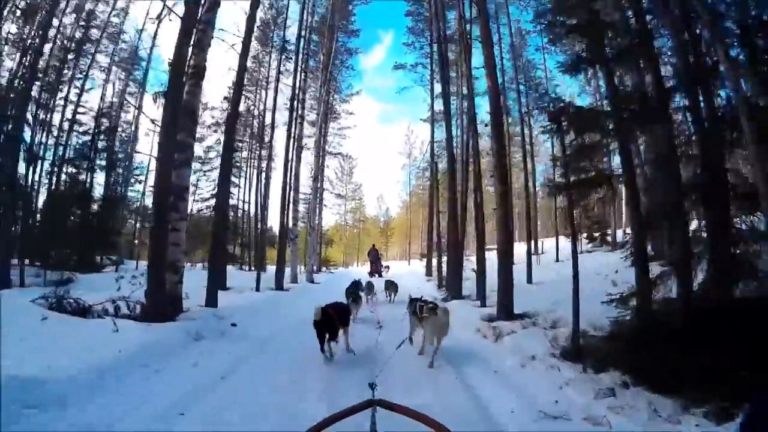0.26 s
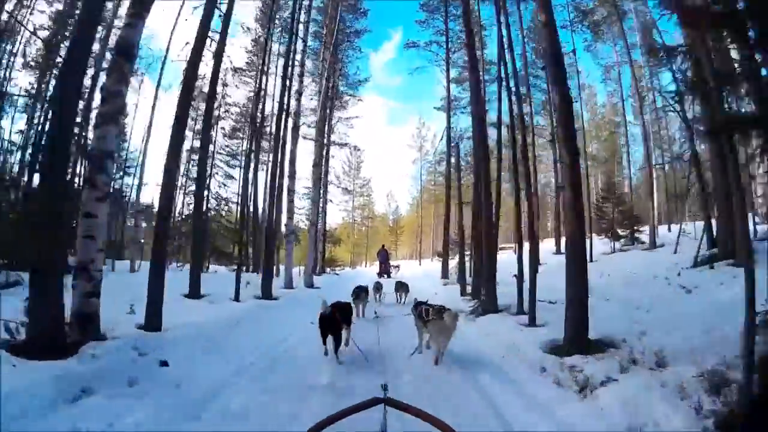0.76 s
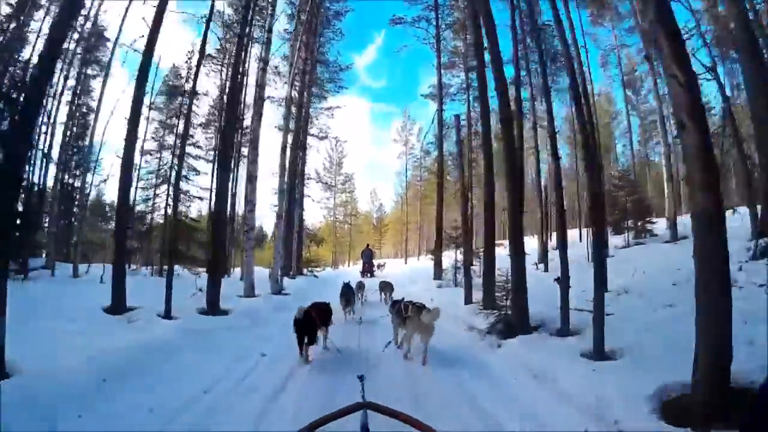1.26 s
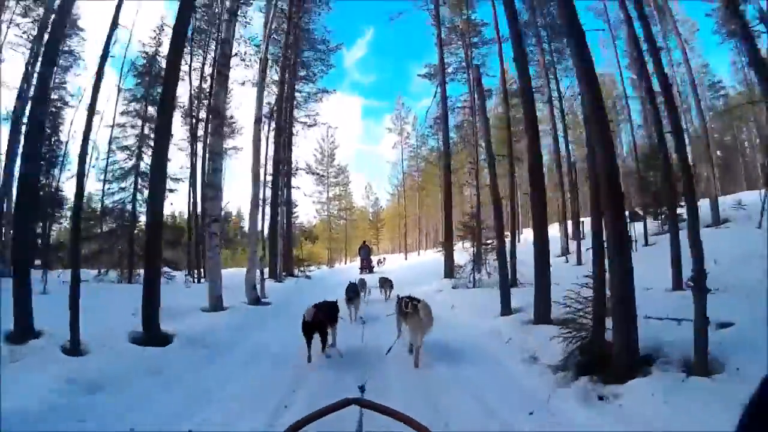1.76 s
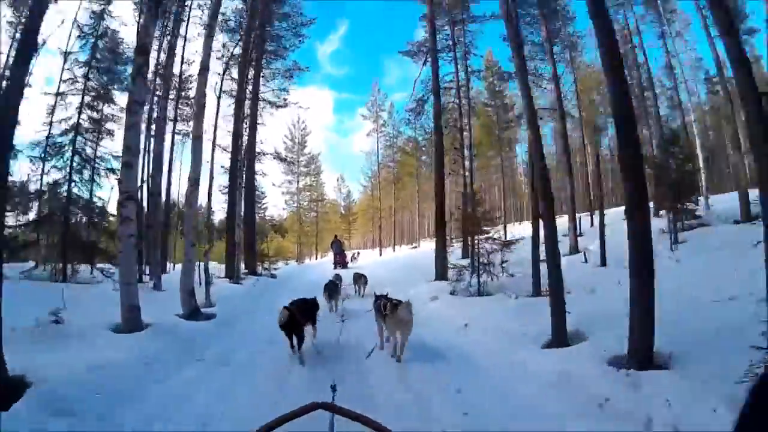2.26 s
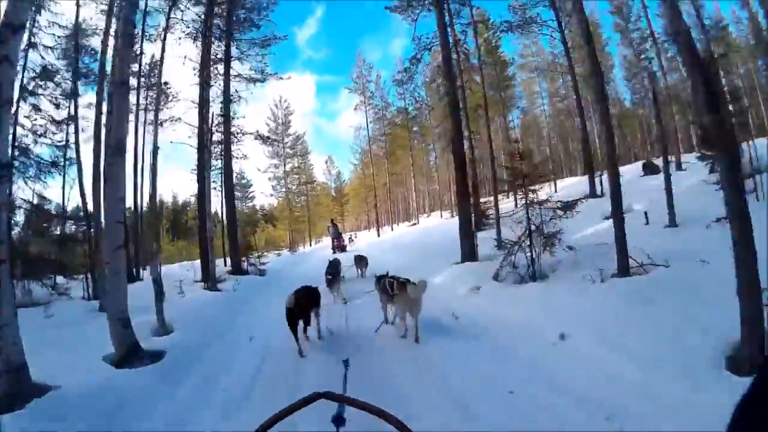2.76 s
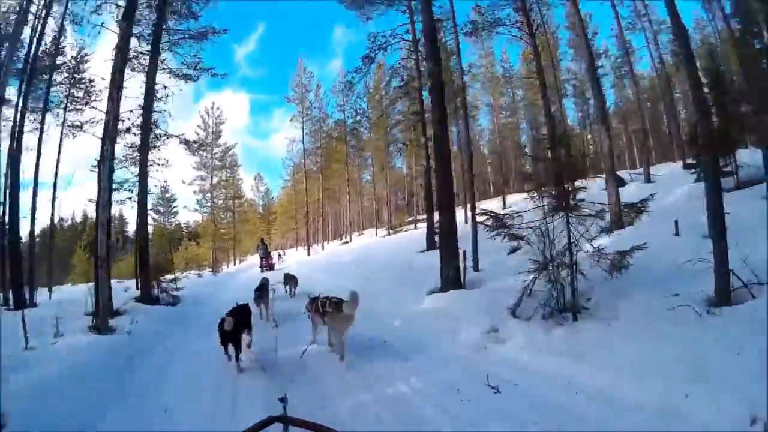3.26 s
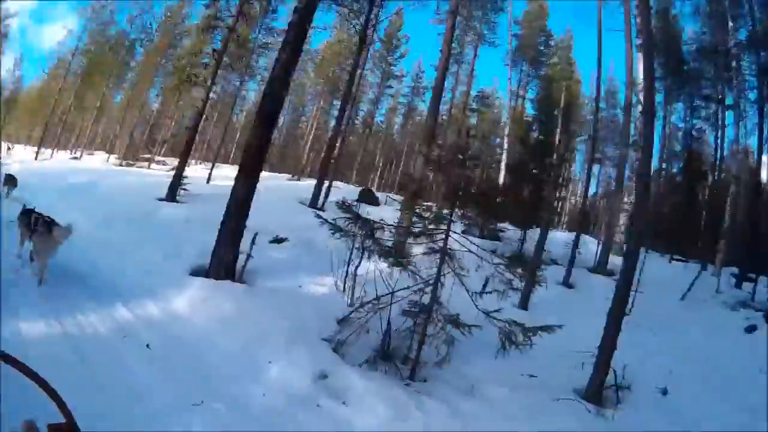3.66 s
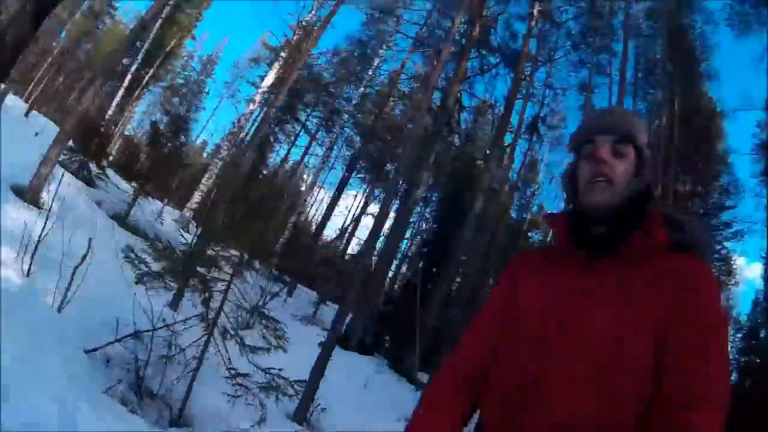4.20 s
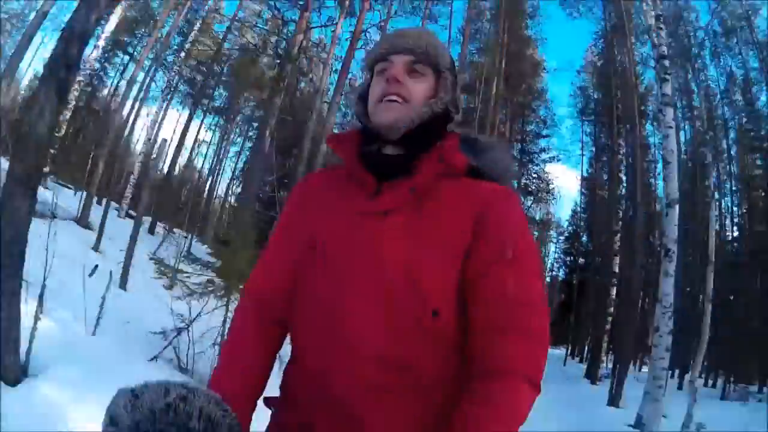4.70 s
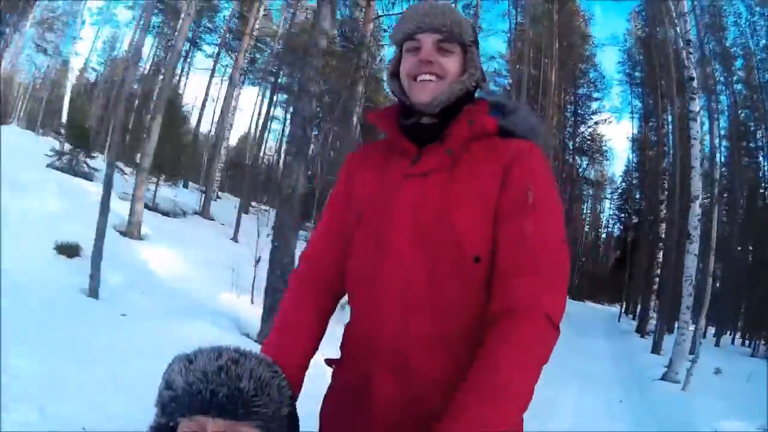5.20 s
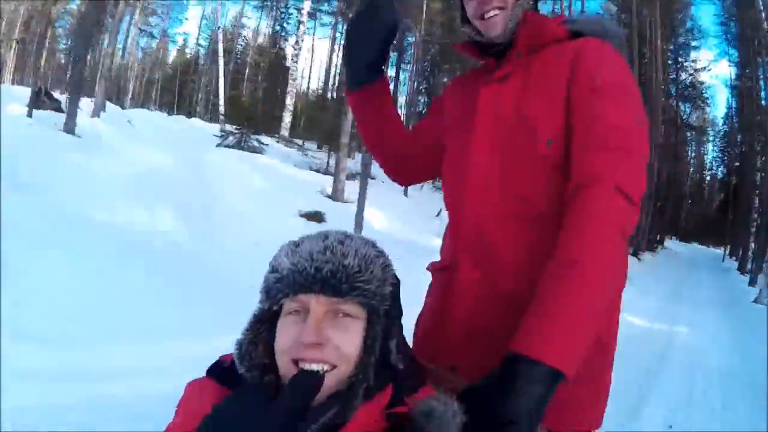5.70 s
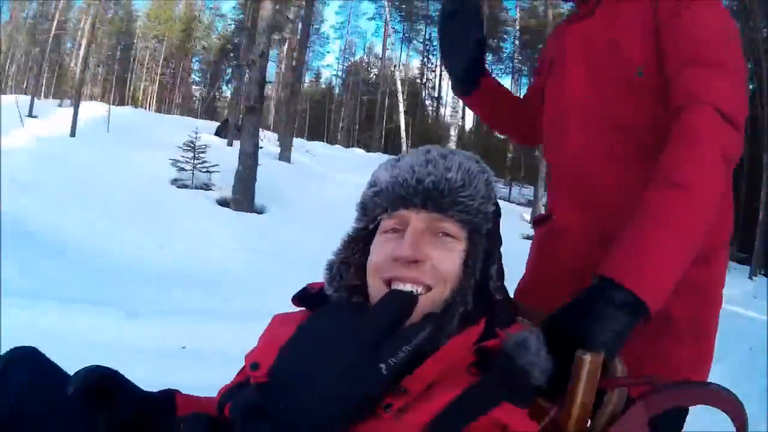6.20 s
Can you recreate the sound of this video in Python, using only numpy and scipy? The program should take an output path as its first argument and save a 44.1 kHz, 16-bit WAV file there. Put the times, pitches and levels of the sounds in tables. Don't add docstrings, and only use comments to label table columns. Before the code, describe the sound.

A microphone riding on a dog sled picks up gritty grinding snow, crisp crust snaps and powdery swishes. Bumps make short, dry knocks in the wooden frame, some in quick rattles. Wind buffets the case with low thuds and short moans, easing around one second, gusting near two, then roaring heavily in the last two seconds over faint electronic hiss.

```python
import sys
import numpy as np
from scipy import signal
from scipy.fft import rfft, irfft
from scipy.io import wavfile
from scipy.ndimage import uniform_filter1d

SR = 44100
rng = np.random.default_rng(int(sys.argv[2]) if len(sys.argv) > 2 else 0)


def dump(signal):
    limited = np.clip(np.atleast_2d(signal).T, -1, 1)
    pcm = np.round(limited * 32767).astype(np.int16)
    wavfile.write(sys.argv[1], SR, pcm)


def gain_from_decibels(decibels):
    exponent = np.asarray(decibels, float) / 20
    return 10 ** exponent


N = 284445

# f/Hz, density/dB per Hz
HISS_SPECTRUM = [(3000, -13), (8000, 1), (12000, -2), (13500, -2), (15200, -5), (15800, -12)]
# f/Hz, level/dB
WHINE = [(7267, -83), (9489, -83.5), (9525, -81), (9562, -83)]

# t/s, strength level/dB, share of large eddies/dB
WIND = [(0, -34.5, 4), (0.25, -40, 11.5), (0.6, -40, 2), (0.95, -46, 8.5), (1.25, -30.5, 9),
        (1.5, -37.5, 8), (1.9, -24, -1), (2.35, -31, 5.5), (2.6, -25, -1), (2.99, -32, 12.5),
        (3.05, -39, 4.5), (3.45, -33.5, -10), (4.15, -31, -4), (4.22, -22, -5), (4.65, -23.5, -6),
        (5.1, -19, -3), (5.85, -21.5, -1), (6.45, -30, 0)]
# centre t/s, length/s, strength level/dB, large eddies/dB
GUSTS = [(0.205, 0.099, 0.5, -3.5), (0.815, 0.11, 2, -8), (0.945, 0.1, -4.5, -2), (1.065, 0.55, 6, -9),
         (1.345, 0.084, -3, -1.5), (1.445, 0.16, -12.5, 3.5), (1.725, 0.17, 4, -4.5),
         (1.955, 0.081, 0.5, -3.5), (2.075, 0.22, -2, -4.5), (2.395, 0.28, -1.5, -3),
         (2.765, 0.085, -4.5, 1), (2.925, 0.17, 1, -7), (3.335, 0.36, -8.5, 12), (3.545, 0.15, 2, 3),
         (4.005, 0.1, 4.5, 2.5), (4.505, 0.18, -6, 7), (4.635, 0.079, -6, 8), (5.265, 0.085, -4.5, -4),
         (5.365, 0.11, 3.5, 0.5), (5.565, 0.23, -3.5, 5.5), (5.825, 0.068, -0.5, 2), (6.015, 0.43, -4, 0.5),
         (6.235, 0.087, -2.5, 2), (6.355, 0.11, 6.5, 4.5)]
# centre t/s, length/s, level/dB
PUFFS = [(0.095, 0.027, -14), (0.2, 0.08, 6), (0.341, 0.03, -2.5), (0.433, 0.026, 6.5), (0.688, 0.04, -6),
         (0.962, 0.04, 1), (1.083, 0.027, 3.5), (1.214, 0.02, -17), (1.261, 0.04, -6), (1.341, 0.036, -2),
         (1.444, 0.06, -2), (1.56, 0.03, 2), (1.819, 0.035, -6), (2.299, 0.04, 1), (2.379, 0.066, -2.5),
         (2.443, 0.05, -1), (2.502, 0.045, 2), (2.76, 0.03, 3.5), (2.814, 0.09, 1), (2.891, 0.019, -9),
         (3.038, 0.037, 0), (3.191, 0.035, -10), (3.238, 0.03, 0), (3.343, 0.03, -7), (3.516, 0.03, -7),
         (3.661, 0.013, 5), (3.769, 0.053, -3), (3.879, 0.03, 6.5), (4.105, 0.043, 0.5), (4.232, 0.091, 2),
         (4.429, 0.038, -2), (4.519, 0.04, 0), (4.622, 0.068, -4), (4.758, 0.1, -2), (4.856, 0.03, -1.5),
         (5.123, 0.069, -4.5), (5.179, 0.034, -4), (5.346, 0.03, -4.5), (5.455, 0.042, -6),
         (5.524, 0.072, -4), (5.59, 0.053, -7.5), (5.828, 0.037, 2), (6.347, 0.061, -4.5),
         (6.409, 0.036, 0.5)]
# f/Hz, density/dB per Hz
RUMBLE_SPECTRUM = [(15, -9), (30, -0.5), (45, -1.5), (65, 0.5), (95, -3.5), (150, -23), (300, -58)]
# f/Hz, density/dB per Hz
BUFFET_SPECTRUM = [(40, -24), (90, -1.5), (150, 1), (260, -2.5), (360, -6), (600, -16.5), (1200, -40)]
# f/Hz, density/dB per Hz
ROAR_SPECTRUM = [(170, -11.5), (330, 0.5), (450, 0), (700, -2.5), (950, -7.5), (1300, -14.5), (2500, -30)]
# centre t/s, length/s, f/Hz, level/dB
MOANS = [(.215, .14, 110, -30), (0.656, 0.075, 420, -42), (1.256, 0.062, 201, -30), (1.305, .04, 169, -27),
         (1.638, 0.078, 260, -36), (1.935, 0.1, 354, -28), (1.976, 0.078, 272, -25.5),
         (2.051, 0.077, 720, -32), (2.3, 0.043, 260, -27), (3.166, 0.046, 234, -36.5),
         (3.534, .04, 248, -31.5), (3.664, 0.031, 570, -32.5), (3.904, 0.044, 193, -38),
         (4.45, 0.073, 194, -33), (4.977, 0.049, 444, -34), (4.969, 0.15, 970, -30.5),
         (5.119, 0.039, 322, -17), (5.342, .04, 400, -21), (5.487, 0.034, 366, -19.5),
         (5.547, 0.029, 292, -26.5), (5.739, 0.03, 423, -25.5)]

# start t/s, end t/s, level/dB, brightest f/Hz
SKIDS = [
    (1.88, 1.999, -47, 12900),
    (2.89, 3.012, -48, 16500),
    (2.125, 2.192, -54, 11500),
    (5.27, 5.302, -56, 16500),
]
# f/Hz, density/dB per Hz
POWDER_SPECTRUM = [(2500, 1), (3700, 7), (5300, -1), (6400, -12), (7200, -3), (8600, -5.5), (10800, -8),
                   (13000, -13), (15800, -21)]

# t/s, peak level/dB, strongest ring f/Hz, upper rings level/dB
KNOCKS = [(0.028, -20, 940, -24), (0.207, -39, 1050, 4), (0.354, -8, 1080, -23), (0.397, -15.5, 1020, -11),
          (0.554, -14.5, 1160, -16), (0.724, -32, 1020, -3), (1.012, -24, 1020, -23),
          (1.145, -25, 1020, -16), (1.17, -20.5, 930, -6.5), (1.381, -15, 1530, -23),
          (1.887, -19, 900, -20), (2.12, -13, 1620, -22), (2.165, -10, 1080, -24), (2.218, -5, 885, -15),
          (2.265, -16, 1710, -21), (2.397, -12.5, 890, -28), (2.436, -15, 1050, -18),
          (2.559, -4.5, 1390, -38), (2.576, -6.5, 1370, -26), (2.64, -9.5, 1440, -30),
          (3.071, -10, 1080, -22), (3.223, -10, 1060, -17), (3.658, -17, 750, -18), (4.184, -12, 900, -29),
          (5.054, -4.5, 870, -21), (5.196, -8.5, 1020, -20), (5.477, -10, 810, -30), (5.633, -2, 1110, -43),
          (5.675, -11, 1090, -18), (6.354, -26, 950, -9), (0.447, -21, 1300, -24), (0.99, -27, 1000, -20),
          (1.731, -12, 980, -25), (1.773, -14, 1030, -32), (1.977, -12.5, 1650, -36),
          (2.182, -10.5, 1720, -22), (2.281, -21, 1010, -11), (2.489, -17, 902, -28),
          (2.703, -14.5, 1320, -17), (3.055, -15.5, 1150, -16), (3.079, -13.5, 1380, -25),
          (3.241, -9, 1000, -28), (3.597, -14, 1400, -17), (3.937, -21, 902, -15), (4.801, -8.5, 1120, -24),
          (4.9, -10, 1130, -21), (5.288, -20, 1170, -15), (5.369, -12, 910, -30), (5.612, -16, 1090, -26),
          (5.847, -19, 1200, -28),
          (.363, -29, 1100, -12), (.379, -32, 1300, -4), (.563, -20, 1300, -24), (2.229, -8, 1090, -24),
        (2.494, -14, 1300, -22), (2.534, -15, 1600, -25), (2.587, -14, 1490, -25), (2.602, -19, 1500, -28),
        (2.611, -19, 1600, -18), (2.649, -9, 1450, -25), (2.688, -15, 960, -26), (2.713, -11.5, 1490, -23)]
# f/Hz, level/dB, decay t60/s
FRAME_MODES = [(1020, 5, 0.0059), (1420, -10.5, 0.025), (1715, -9, 0.019)]
# f/Hz, level/dB, decay t60/s
STRUT_MODES = [(2260, 7.5, 0.024), (2564, 6, 0.021), (2950, 2, 0.013), (3425, 6.5, 0.017),
               (3740, -24, .015), (4850, -10.5, 0.023)]

# t/s, load level/dB, loose powder level/dB
RUNNERS = [(0, -38.5, -26.5), (0.55, -36.5, -25.5), (0.9, -42, -37), (1.05, -39.5, -22), (1.7, -33, -25),
           (2.05, -40.5, -15.5), (2.35, -35.5, -26.5), (2.6, -33.5, -24.5), (2.85, -35.5, -24.5),
           (3.1, -31.5, -25), (3.45, -33.5, -24), (3.95, -36.5, -16.5), (4.79, -37, -20),
           (4.84, -26.5, -36.5), (5.3, -29, -27.5), (5.95, -36, -25), (6.08, -32.5, -21.5),
           (6.45, -33, -21.5)]
# centre t/s, length/s, level/dB, powder thrown/dB
RUTS = [(.285, 0.097, -0.5, 0), (.385, .13, 0, 1.5), (.565, .06, 1.5, 2), (.695, 0.18, 4.5, 5),
        (.9, 0.082, 6.5, 4), (.965, 0.21, -7.5, 3), (1.115, .083, -1, -4), (1.185, 0.098, 1, -2),
        (1.325, 0.16, -2, -2), (1.625, 0.07, -1.5, -2), (2.055, .06, -5, 0), (2.145, 0.11, 5.5, 0.5),
        (2.215, 0.21, -1.5, 0.5), (2.29, 0.098, 3, 0), (2.495, 0.039, 4.5, 2), (2.7, 0.15, 1, 3.5),
        (3.075, .1, -1, 4), (3.195, 0.053, -0.5, 0), (3.325, 0.28, -4, 3), (3.495, 0.099, -3, 0),
        (3.725, 0.05, -2, -3), (3.835, 0.15, -2.5, -1.5), (3.945, 0.083, 4, -4.5), (4.335, 0.16, 7.5, -6),
        (4.455, 0.19, 4.5, -3), (5.06, 0.091, 0, -1), (5.345, 0.26, 0.5, 0.5), (5.685, 0.14, 3, 0),
        (5.845, 0.051, 4, -1), (6.265, .13, -0.5, -3.5)]
# centre t/s, length/s, level/dB
LUMPS = [(0.017, 0.03, 7), (0.131, 0.034, 6), (0.191, 0.19, -2.5), (0.307, 0.04, 1), (0.43, 0.027, -9),
         (0.485, 0.028, -4), (0.702, 0.065, -6), (0.749, 0.065, -3.0), (0.813, 0.05, -5), (0.916, 0.03, -4),
         (1.033, 0.073, 9), (1.35, 0.09, -3), (1.607, 0.045, -1.5), (1.692, 0.063, 2.5), (1.825, 0.053, -1),
         (1.915, 0.05, -13), (1.979, 0.051, -16), (2.078, 0.079, -4), (2.19, 0.056, 5.5), (2.38, 0.16, -5),
         (2.517, 0.03, -3), (2.687, 0.04, -1), (2.785, 0.065, -3), (2.86, 0.044, 1.5), (3.081, 0.045, 5),
         (3.179, 0.04, -6.5), (3.326, 0.044, -1), (3.472, 0.09, -4.0), (3.604, 0.034, 0),
         (3.656, 0.036, -2), (4.884, 0.073, -4), (5.267, 0.063, -5), (5.318, 0.044, 5.5), (5.37, 0.04, 4),
         (5.439, 0.1, -3.5), (5.536, 0.046, 1.5), (6.117, 0.036, 4), (6.37, 0.07, -1)]
# centre t/s, length/s, level/dB
FLURRIES = [(.361, 0.065, 5), (.472, .04, -7), (1.176, .04, 6), (1.598, .04, -3), (1.81, .09, -3),
            (2.042, .09, -4), (2.119, .03, -4), (2.221, 0.015, 13), (2.31, .06, -4), (2.574, 0.046, 6),
            (2.873, .04, 3), (2.959, .05, 6), (3.023, .04, -5), (3.25, .04, -7), (3.419, .05, 5),
            (3.613, .04, -1), (3.68, .04, 2), (3.71, .05, -4), (3.938, 0.04, 7), (4.078, 0.026, 5),
            (4.435, .03, 0), (4.485, .03, 4.5), (4.53, 0.049, 5), (4.749, 0.1, 4), (5.347, .025, 5),
            (5.951, 0.077, -4), (6.079, .05, 3), (6.2, .04, 4)]
# t/s, level over the steady crunch/dB
SNAPS = [(.026, 5), (.158, 9), (.209, 9), (.227, 10), (.355, 8), (.397, 8), (.448, 8), (.552, 8), (.724, 9),
         (.897, 4), (1.011, 8), (1.146, 6), (1.171, 8), (1.222, 5), (1.575, 5), (1.888, 5), (2.165, 4),
         (2.218, 8), (2.398, 5), (2.436, 6), (2.559, 6), (2.951, 6), (3.223, 8), (3.657, 5), (4.075, 4),
         (5.053, 5), (5.341, 5), (6.354, 6), (2.285, 5), (6.078, 5), (2.494, 7), (3.931, 6), (4.434, 5),
         (4.483, 5), (5.277, 6), (6.251, 6)]
# f/Hz, density/dB per Hz
GRIND_SPECTRUM = [(500, 2.5), (900, 4.5), (1050, 1.5), (1300, -2), (1500, -0.5), (1680, -10.5),
                  (1820, -9.5), (1980, -34), (3000, -32)]
# f/Hz, density/dB per Hz
CRUNCH_SPECTRUM = [(1500, -0.5), (2100, 1.5), (2500, -2.5), (3000, -6), (3450, -5), (4000, -14),
                   (4500, -20), (5000, -23.5), (6200, -32.5)]
# f/Hz, density/dB per Hz
SPRAY_SPECTRUM = [(3200, 7), (4200, 2.5), (4600, -2.5), (5300, -2), (6270, -9), (7010, -1.5), (7560, -1),
                  (9060, -7), (10300, -6.5), (12000, -14), (13500, -19), (15100, -16), (15800, -14)]

# centre t/s, length/dropout units, treble lost above f/Hz
DROPOUTS = [(.052, 1, 4300), (.649, 1, 4300), (.713, 1, 3900), (.884, 1, 2800), (.969, 0.85, 3000),
            (1.353, 1.1, 4300), (1.46, 0.9, 4000), (1.865, 1.1, 5400), (2.718, 0.94, 4100),
            (2.782, 1, 4300), (3.465, 1, 3940), (4.894, 1, 4300), (5.022, 1.1, 4100), (5.097, 2.1, 4070),
            (5.15, 1, 4900), (5.236, 1.06, 4000), (5.428, 1, 4000)]
# centre t/s, f/Hz, level/dB
LONE_TONES = [(.649, 5000, -60), (.713, 4650, -62), (.884, 5000, -58), (.884, 3820, -52), (.884, 7100, -65),
              (.884, 8400, -65), (.884, 3020, -54), (.884, 3500, -57), (.649, 3900, -57), (1.46, 8700, -63),
              (1.46, 7700, -64), (1.46, 3750, -56), (3.465, 8400, -66), (2.782, 4100, -57),
              (1.46, 4800, -63), (2.782, 5100, -62), (5.428, 4950, -60), (5.15, 4600, -55),
              (5.15, 4200, -54), (5.1, 3900, -53), (2.718, 5000, -62), (2.782, 7400, -66),
              (1.865, 5100, -60)]
DROPOUT_S = 1024 / 48000


def evened(x):
    return x / np.sqrt(np.mean(x ** 2) + 1e-20)


def read(points, hz):
    f, value = np.transpose(points)
    return np.interp(np.log(hz + 1), np.log(f + 1), value, left=-90, right=-90)


def curve(rows, count):
    columns = np.transpose(rows)
    return np.interp(np.arange(N) / SR, columns[0], columns[count])


def add(mix, s, sound):
    part = mix[max(round(s * SR), 0):][:len(sound)]
    part += sound[:len(part)]


def swells(rows, count):
    out = np.zeros(N)
    for row in rows:
        centre, length = row[:2]
        add(out, centre - length / 2, row[count] * np.hanning(round(length * SR)))
    return out


def flutter(hz, db):
    f = np.fft.rfftfreq(N, 1 / SR)
    band = f ** 4 / (f ** 4 + 9 ** 4) / np.sqrt(f + 3) / (1 + (f / hz) ** 4)
    return gain_from_decibels(db * evened(irfft(rfft(rng.standard_normal(N)) * band, N)))


def coloured(drive, shape, patchy_db, size=1024, steady=0):
    overlap = size * 3 // 4
    hz, _, z = signal.stft(drive, SR, nperseg=size, noverlap=overlap)
    patches = rng.standard_normal(z.shape[::-1]).T
    patches = uniform_filter1d(patches, size=10, axis=0)
    patches = evened(uniform_filter1d(patches, size=10, axis=1))
    swell = uniform_filter1d(abs(z) ** 2, size=3, axis=0)
    swell = uniform_filter1d(swell, size=32768 // size, axis=1)
    gain = gain_from_decibels(read(shape, hz)[:, None] + patchy_db * patches)
    z = z * gain / (swell + 1e-20) ** (steady / 2)
    return evened(signal.istft(z, SR, nperseg=size, noverlap=overlap)[1][:N])


def crystals(per_s, spread_db, smooth):
    size = gain_from_decibels(spread_db * np.minimum(rng.exponential(1, N), 5)) * rng.choice([-1., 1.], N)
    clicks = size * (rng.random(N) < per_s / SR)
    return evened(clicks) + smooth * rng.standard_normal(N)


def electronic_noise():
    t = np.arange(N) / SR
    whine = np.zeros(N)
    for hz, db in WHINE:
        whine += gain_from_decibels(db - 3.5 + 0.7 * t) * flutter(hz=12, db=3) * np.sin(2 * np.pi * hz * t)
    hiss = coloured(rng.standard_normal(N), HISS_SPECTRUM, patchy_db=1.5, size=512)
    return whine + gain_from_decibels(-70) * hiss


def moans():
    out, chance = np.zeros(N), rng.standard_normal((len(MOANS), 12000))
    spread = 1.3
    for (s, length, hz, db), air in zip(MOANS, chance):
        size = round(length * SR)
        band = signal.butter(2, [hz / spread, hz * spread], "band", fs=SR, output="sos")
        moan = signal.sosfilt(band, air)[-size:] * np.hanning(size)
        add(out, s - length / 2, gain_from_decibels(db) * evened(moan))
    return out


def wind():
    gusts = flutter(hz=24.2, db=0.2)
    rumble = coloured(rng.standard_normal(N), RUMBLE_SPECTRUM, patchy_db=0.1, size=4096, steady=0.4)
    large_eddies = rng.standard_normal(N) * gusts * flutter(hz=30, db=0.8)
    buffet = coloured(large_eddies, BUFFET_SPECTRUM, patchy_db=0.73, size=2048, steady=0.54)
    small_eddies = rng.standard_normal(N) * gusts * flutter(hz=51.0, db=0.85)
    roar = coloured(small_eddies, ROAR_SPECTRUM, patchy_db=0.5, steady=0.3)
    strength_db = curve(WIND, count=1) + swells(GUSTS, count=2) + swells(PUFFS, count=2)
    large_db = strength_db + curve(WIND, count=2) + swells(GUSTS, count=3)
    rumble_db = -36.5 + 0.45 * (large_db - large_db.mean())
    return rumble * gain_from_decibels(rumble_db) + buffet * gain_from_decibels(large_db - 0.24) + roar * gain_from_decibels(strength_db - 0.3)


def skids():
    out = np.zeros(N)
    grains = crystals(per_s=4000, spread_db=3.1, smooth=2.1)
    powder = coloured(grains, POWDER_SPECTRUM, patchy_db=0.0, size=512)
    for start, end, db, hz in SKIDS:
        t = np.arange(start, end, 1 / SR)
        lowpass = signal.butter(12, min(hz, 20000), fs=SR, output="sos")
        hiss = signal.sosfilt(lowpass, powder[round(start * SR):][:len(t)])
        build = np.minimum((t - start) / (end - start) / 0.36, 1)
        grip = np.minimum((end - t) / 0.0054, 1)
        add(out, start, gain_from_decibels(db) * hiss * build * grip)
    return out


def rung(rattle, modes, uneven):
    t = np.arange(len(rattle)) / SR
    ring = np.zeros(len(t))
    for (hz, db, t60), u, v in zip(modes, uneven, uneven[50:]):
        decay = gain_from_decibels(db + 0.24 * u - 60 * t / t60)
        ring += decay * np.sin(2 * np.pi * hz * (1 + 0.037 * v) * t)
    onset = np.sin(np.pi / 2 * np.minimum(t / 0.0013, 1)) ** 2
    body = signal.fftconvolve(rattle, ring * onset)[:len(t)]
    return body / abs(body).max()


def knocks():
    out, t = np.zeros(N), np.arange(3000) / SR
    blows_list = KNOCKS
    chance = rng.standard_normal((len(blows_list), 3, len(t)))
    tick_band = signal.butter(2, [6500, 11500], "band", fs=SR, output="sos")
    for (s, db, hz, upper_db), (blows, hiss, uneven) in zip(blows_list, chance):
        chatter = 0.14 * blows * (t > t[80]) * np.exp(-((t - 0.004) / 0.0044) ** 2)
        rattle = (t == t[130]) + chatter
        low = rung(rattle, FRAME_MODES + [(hz, -1.5, 0.012)], uneven)
        upper = rung(rattle, STRUT_MODES, uneven[10:])
        body = low + gain_from_decibels(upper_db + 4.0) * upper
        tick = evened(signal.sosfilt(tick_band, hiss)) * np.exp(-t / 0.0052)
        tick = tick * np.minimum(t / 0.0018, 1) / 2
        thump_hz = 300 * (1 + 0.3 * np.tanh(uneven[99]))
        thump = np.sin(2 * np.pi * thump_hz * t) * np.exp(-t / 0.005) * np.minimum(t / 0.0015, 1)
        tick_db = -57 + 0.56 * (db + upper_db + 31)
        add(out, s - 0.0045, gain_from_decibels(db - 8.5) * (body + gain_from_decibels(-20) * thump) + gain_from_decibels(tick_db) * tick)
    return out


def snapping():
    out, t = np.zeros(N), np.arange(2000) / SR
    for s, db in SNAPS:
        add(out, s - 0.0025, db * np.minimum(t / 0.003, 1) * np.exp(-(t / 0.01) ** 2))
    return out


def runners():
    load = flutter(hz=45.4, db=1.2)
    breaking = crystals(per_s=900, spread_db=4.0, smooth=1.74) * load
    grind = coloured(breaking, GRIND_SPECTRUM, patchy_db=1.3, size=512)
    crunch = coloured(breaking, CRUNCH_SPECTRUM, patchy_db=1.5, size=512)
    thrown = crystals(per_s=2300, spread_db=5.0, smooth=2.7) * load ** 0.35 * flutter(hz=110, db=1.5)
    spray = coloured(thrown, SPRAY_SPECTRUM, patchy_db=1.5, size=512)

    load_db, powder_db = curve(RUNNERS, count=1), curve(RUNNERS, count=2)
    rut_db, lump_db, snap_db = swells(RUTS, count=2), swells(LUMPS, count=2), snapping()
    grind_db = load_db + rut_db + lump_db + 0.5 * snap_db + 0.5
    crunch_db = load_db + rut_db + lump_db + snap_db - 13 + 1.0
    crunch_db += 0.15 * (powder_db - powder_db.mean())
    spray_db = load_db + powder_db + 0.78 * rut_db + 0.12 * lump_db + 0.55 * snap_db + 1.04
    spray_db += swells(RUTS, count=3) + swells(FLURRIES, count=2)
    return grind * gain_from_decibels(grind_db) + crunch * gain_from_decibels(crunch_db) + spray * gain_from_decibels(spray_db)


def scene():
    return (moans() + wind() + skids() + knocks() + runners())[None]


def treble_dropouts(x):
    out, t = x.copy(), np.arange(N) / SR
    for s, length, hz in DROPOUTS:
        span = slice(round((s - 0.05) * SR), round((s + 0.05) * SR))
        highpass = signal.butter(16, hz, "high", fs=SR, output="sos")
        treble = signal.sosfiltfilt(highpass, out[span])
        away = np.clip(abs(t[span] - s) / DROPOUT_S - (length - 1) / 2, 0, 1)
        out[span] -= treble * (1 - np.sin(np.pi / 2 * away))
    u = np.arange(round(2 * DROPOUT_S * SR)) / SR
    fade = np.sin(np.pi * u / (2 * DROPOUT_S)) ** 2
    for s, hz, db in LONE_TONES:
        lines = sum(np.sin(2 * np.pi * (f * u + rng.random())) for f in hz + np.array([-70, 0, 47]))
        add(out, s - DROPOUT_S, gain_from_decibels(db - 4) * lines * fade)
    return out


def band_limit(x):
    return signal.sosfilt(signal.butter(12, 16440, fs=SR, output="sos"), x)


def record(dry):
    overloaded = 0.74 * np.tanh(dry[0] / 0.76)
    faded = treble_dropouts(overloaded + electronic_noise())
    band_edge = signal.firwin(1023, 15730, window=("kaiser", 10), fs=SR)
    mix = signal.oaconvolve(faded, band_edge, "same")[None]
    return band_limit(mix)


dry = scene()
out = record(dry)
dump(out)
```